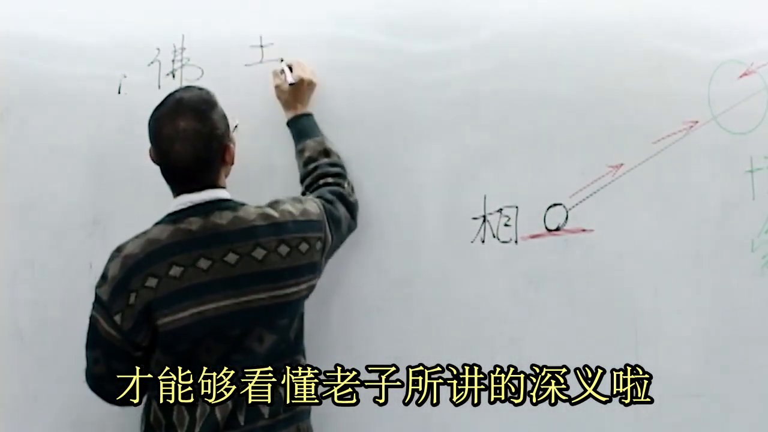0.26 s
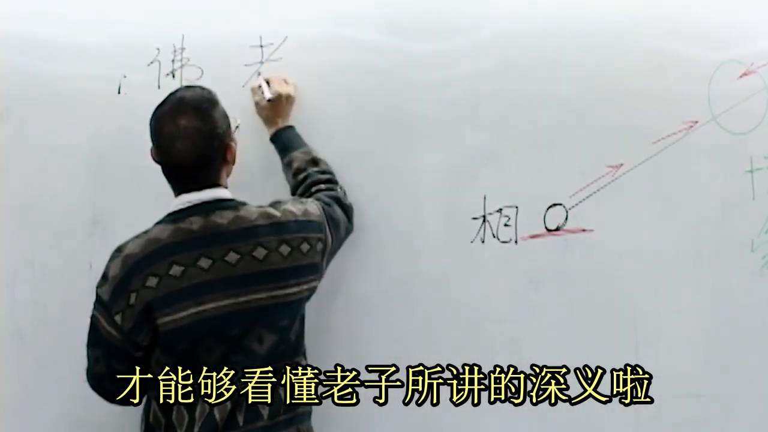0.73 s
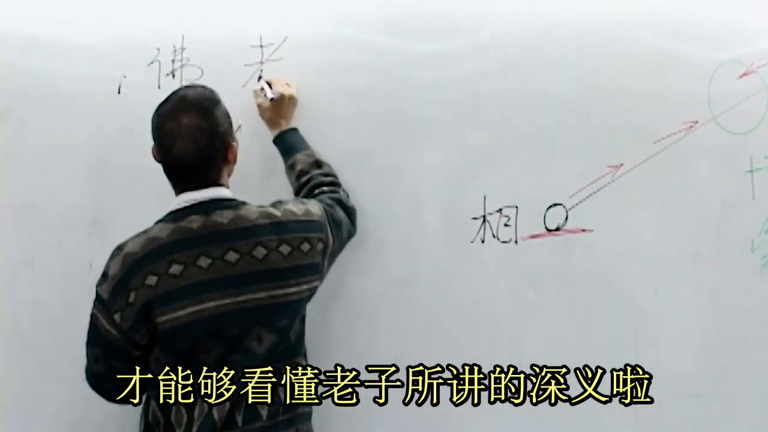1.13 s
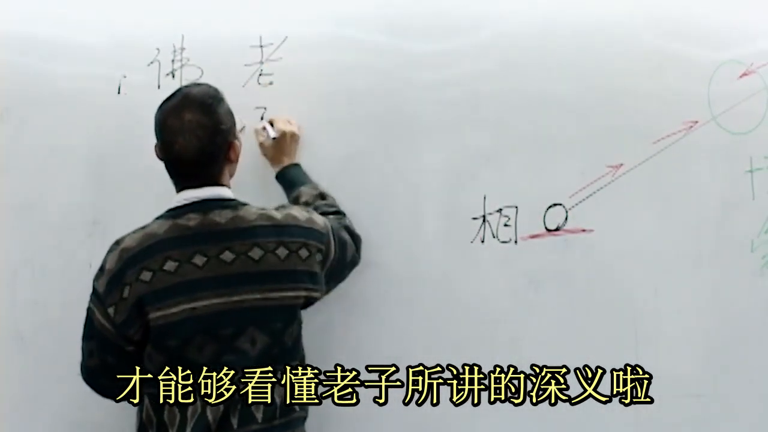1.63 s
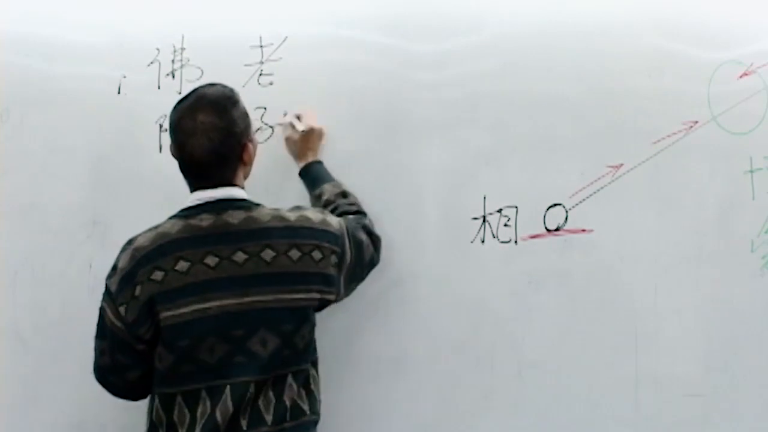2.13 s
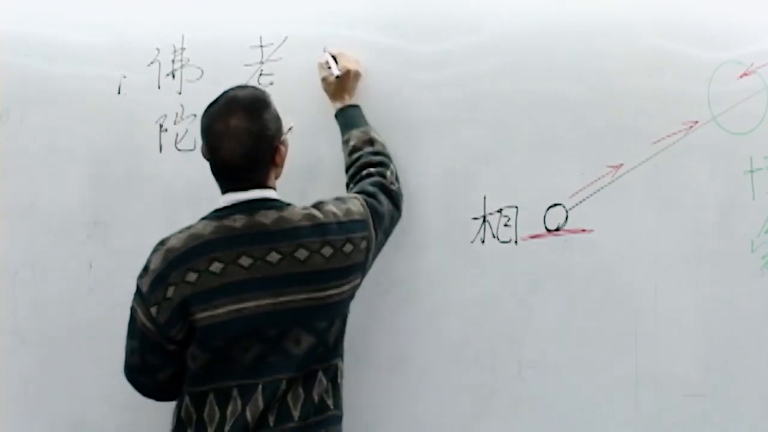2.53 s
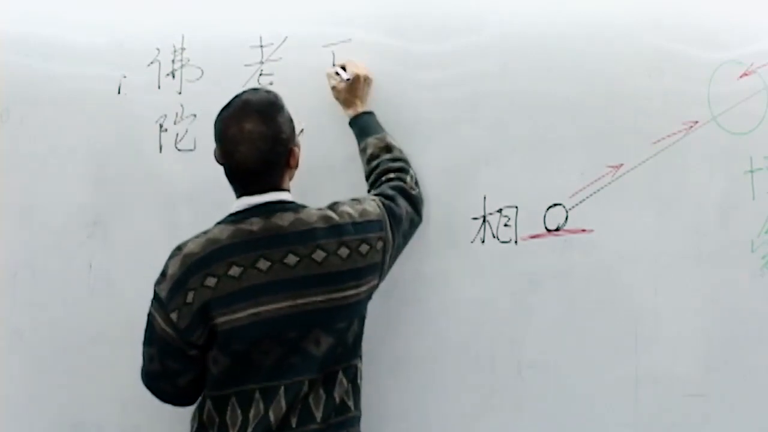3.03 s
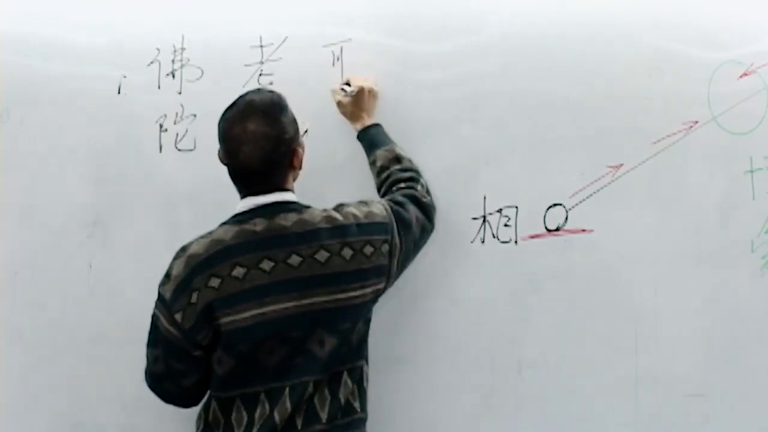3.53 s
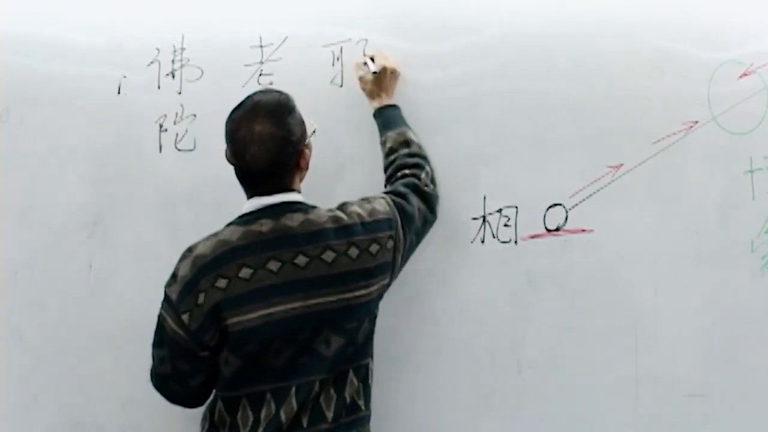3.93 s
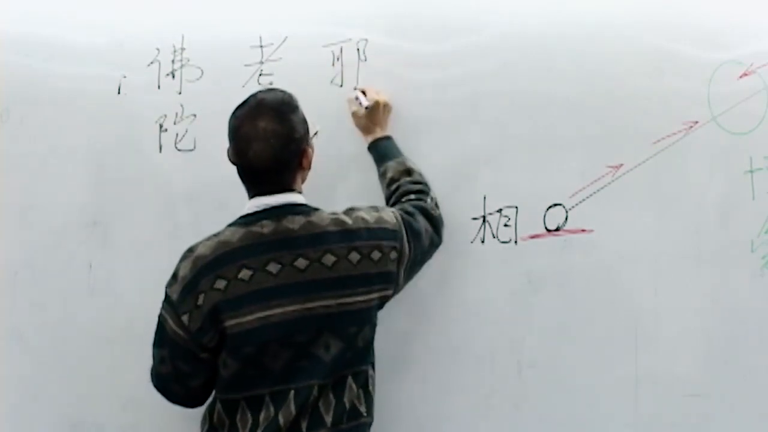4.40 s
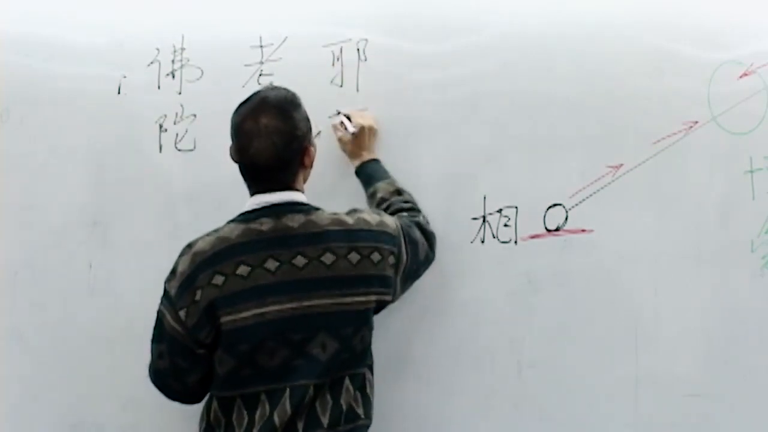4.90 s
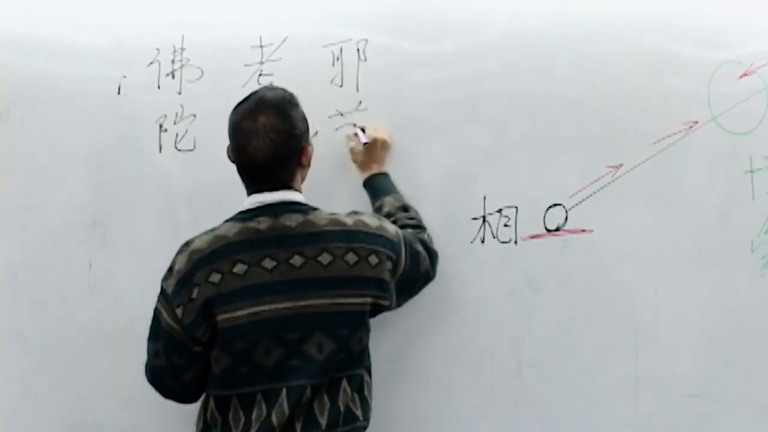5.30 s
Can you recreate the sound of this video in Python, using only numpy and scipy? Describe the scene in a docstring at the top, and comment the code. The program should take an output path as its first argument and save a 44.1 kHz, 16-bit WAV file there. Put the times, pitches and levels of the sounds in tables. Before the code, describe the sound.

A felt marker writes on a whiteboard with short high squeaks, light hiss and soft thuds over a low room hum.

```python
"""A felt marker writes on a whiteboard in a lecture room.
A low hum and a thin, wavering whine are there from the start, with the first of a few faint hollow pings.
Then the strokes begin: the felt hisses as it slides, and sticks and slips in short squeaks.
From about 1.3 s the hand also bumps soft thuds out of the board; the tip ticks and chirps on landing.
The sharpest squeak comes near 3.75 s, and a cluster of thuds near 5 s leads into the last strokes."""
import sys
import numpy as np
from scipy import signal
from scipy.fft import rfft, irfft
from scipy.io import wavfile
from scipy.ndimage import map_coordinates

SR = 44100
rng = np.random.default_rng(int(sys.argv[2]) if len(sys.argv) > 2 else 0)


def store_pcm(level_fs):
    """Save levels as 16-bit WAV."""
    pcm = np.round(np.clip(level_fs, -1, 1) * 32767).astype(np.int16)
    wavfile.write(sys.argv[1], SR, np.atleast_2d(pcm).T)


N = 244755
TIME = np.arange(N) / SR

# colour of the room's drone and of the air above it: (frequency [Hz], density [dB])
HUM_SPECTRUM = [(12, -53), (20, -16), (29, -19), (37, -7.5), (59, 3), (72, -7), (79, -16), (87, -11.5),
                (102, -25), (140, -30.5), (157, -44), (290, -59.5), (384, -61.5), (420, -60), (550, -85),
                (920, -120)]
AIR_SPECTRUM = [(200, 2), (500, 4), (1000, -3.5), (3000, -11), (15000, -12)]
# fader ride of the drone: (time [s], level [dB])
HUM_RIDE = [(0, -42), (.2, -68), (.35, -42), (.5, -64.5), (.57, -38.5), (1.0, -51.5), (1.7, -39.5),
            (1.87, -48.5), (2.16, -55.5), (2.4, -45), (2.7, -54), (3.03, -44.5), (3.2, -47), (4.0, -48),
            (5.05, -41.5), (5.55, -47.5)]
# ceiling and side echoes: (delay [s], level [dB])
ROOM_ECHOES = [(0.037, -20), (.058, -25.5)]
# faint hollow pings, and the hand bumping the board:
# (time [s], level [dB], strongest frequency [Hz], roll-off either side [dB/octave], contact time [s])
PING_HITS = [(0.002, -52.5, 818, 103, 0.026), (2.692, -61.5, 1045, 59, 0.014),
             (2.718, -48.5, 890, 63.5, 0.0088), (3.474, -47.5, 1084, 3.5, 0.014),
             (3.500, -44, 841, 37.5, 0.011), (4.548, -57.5, 1002, 69, 0.018),
             (4.567, -54.5, 1150, 34.5, 0.01)]
HAND_BUMPS = [(1.29, -68, 340, -1.5, 0.0026), (1.643, -30.5, 281, 18, 0.016),
              (3.028, -46.5, 129, 28.5, .012), (3.25, -67.5, 330, 2.5, 0.0034),
              (3.752, -29, 57.4, 14.5, 0.0089), (3.891, -32, 166, 44, 0.0069),
              (4.722, -33.5, 276, 18, 0.007), (4.986, -43.5, 399, 5.5, 0.0091),
              (5.007, -24.5, 220.3, 3.5, 0.003), (5.163, -44.5, 182, 11, 0.0092)]
# modes of the pings and of the board: (frequency [Hz], level [dB], t60 [s])
PING_MODES = [(643, -8.5, 0.24), (858.4, 3.5, 0.16), (983.5, 9, 0.17), (1187, -18, 0.17),
              (1276, -11.5, 0.16), (1480, -9, 0.16), (1627, -17, 0.17)]
BOARD_MODES = [(56.5, 4.5, 0.18), (92, -8.5, 0.53), (140.3, -8.5, 0.31), (192.5, -5.5, 0.19),
               (232, -11.5, 0.22), (282, 1.5, 0.11), (316.8, -3, .09), (396, -5.5, 0.091),
               (658, -15, 0.088), (770, -13, .06), (848, -12.5, 0.084), (1130, -22, 0.062)]
# colour of the felt's lower hiss, upper hiss, crackle and snap: (frequency [Hz], density [dB])
LOW_HISS_SPECTRUM = [(3700, -51.5), (4250, -14.5), (4600, 6.5), (5200, 6), (5700, 5), (6200, -32)]
HIGH_HISS_SPECTRUM = [(5400, -29.5), (5900, 1), (6500, 6.5), (7200, 6.5), (7600, -11.5), (8200, -24),
                      (9000, -39.5), (15000, -55.5)]
CRACKLE_SPECTRUM = [(1500, -52.5), (3400, -31), (4150, -2.5), (5200, 8), (6100, -0.5), (7200, 4),
                    (7900, -19), (8800, -31.5), (12500, -42), (15000, -50.5)]
SNAP_SPECTRUM = [(150, -5), (1200, -9), (3000, -11.5), (6000, -3), (13000, -2), (16000, -6)]
# the felt slides:
# (time [s], length [s], final level [dB], swell [dB], relative upper hiss [dB], resonance [Hz])
PEN_STROKES = [ (.26, 0.13, -64, 1, -32, 4800), (0.63, 0.11, -54.5, 20, -13, 5040),
               (.97, 0.14, -52.5, 22, -2.5, 5250), (1.325, 0.044, -51.5, 2.5, -10, 4770),
               (1.721, 0.1, -65.5, -2, -1, 4800), (1.875, 0.037, -55, 3, -0.5, 4800),
               (1.922, 0.029, -49.5, 0, -13, 4550), (2.028, 0.097, -47, 2, -8, 5070),
               (2.763, .06, -57, 12.5, -33.5, 4920), (3.05, 0.036, -59, 15, -18.5, 5450),
               (3.53, 0.098, -49.5, 11, -8.5, 5490), (3.68, 0.02, -54, 8.5, -11, 4900),
               (3.986, 0.064, -55.5, 3, -12, 5770), (4.3, 0.12, -51.5, 13.5, -17, 5300),
               (4.527, 0.29, -77, 2, -22, 5180), (4.767, 0.067, -48, 8.5, -12.5, 5000),
               (5.036, .08, -74.5, -1.5, -9, 4990), (5.216, 0.067, -69, -13, -9, 4480),
               (5.36, 0.061, -52.5, 1.5, -8.5, 4740), (5.47, 0.13, -56, 4.5, 3.5, 5500), ]
# the tip lands: (time [s], barrel ring [Hz], barrel level [dB], crackle level [dB])
TIP_LANDINGS = [ (0.388, 2540, -75.5, -45), (1.294, 2870, -48, -39), (1.659, 3030, -61, -58.5),
                (2.201, 2913, -55, -45.5), (3.257, 2722, -35.5, -38), (3.371, 2810, -50.5, -51),
                (3.483, 2804, -52, -59.5), (3.649, 2735, -40.5, -32.5), (3.746, 2645, -38.5, -22.5),
                (3.758, 2805, -36, -33), (4.48, 2897, -59, -62.5), (4.557, 2794, -66, -84.5),
                (4.88, 2815, -50.5, -56), (5.011, 2825, -101, -54.5), ]
# the tip is set down and chirps:
# (time [s], length [s], level [dB], level change [dB], last pitch [Hz], rasp [0-1])
TIP_CHIRPS = [ (1.289, 0.0077, -34, 3.5, 5720, 0.04), (1.294, 0.014, -22, -5, 4760, 0),
              (1.659, 0.0085, -23.5, -24.5, 5070, 0), (3.2504, 0.014, -17, -22, 5660, .06),
              (3.365, 0.017, -40, -8.5, 5410, .15), (3.742, 0.01, -15, 1, 5553, 0.09),
              (4.74, 0.0086, -27, -15.5, 5160, 0.01), ]
# the sliding tip catches: (time [s], length [s], level [dB], level change [dB], first pitch [Hz],
# middle pitch [Hz], last pitch [Hz], 2nd partial [dB], rasp [0-1], wall echo [dB])
TIP_SQUEAKS = [ (.245, .013, -56.5, 6, 4720, 4630, 4800, -47, 0, -17),
               (0.381, .012, -36, -8, 4650, 4264, 4290, -21.5, 0.01, -34),
               (.891, 0.019, -57.5, 4, 4660, 4390, 4550, -47.5, 0, -30.5),
               (1.07, .03, -13, -16, 4506, 4340, 3960, -24.5, .01, -17.5),
               (1.095, 0.0094, -24.5, 1, 4394, 4306, 4360, -23.5, 0.81, -15),
               (1.361, 0.025, -22.5, -6, 4483, 4350, 4247, -21.5, 0, -22),
               (2.1297, 0.02, -10.5, -18, 4780, 4828, 4320, -28, 0, -11.5),
               (2.845, 0.025, -34, -14, 4570, 4360, 4370, -16, 0, -14.5),
               (3.623, .021, -35.5, 4, 4780, 4570, 4360, -50.5, .25, -20),
               (3.7535, .016, -6, -2, 4873, 4858, 5060, -25, .02, -12),
               (4.13, 0.025, -16.5, -8.5, 4528, 4510, 5020, -26.5, 0, -10.5),
               (4.851, 0.011, -18.5, -4.5, 4784, 4676, 4370, -38, 0, -19),
               (5.181, 0.014, -24.5, -6, 4734, 4302, 4510, -21.5, 0, -14.5),
               (5.3414, 0.02, -16.5, 4.5, 4514, 4520, 4706, -35.5, 0, -21.5),
               (5.541, 0.017, -17.5, 8, 5207, 4967, 5080, -29.5, 0, -18), ]

WALL_DELAY_S = 0.0285
PURE_SECOND_DB = -45  # 2nd partial of the nearly pure chirps and lead-ins


def from_db(db):
    """Decibels to gain."""
    return 10 ** (np.asarray(db) / 20)


def rms_one(x):
    """Normalise to rms 1."""
    return x / np.sqrt(np.mean(x ** 2) + 1e-20)


def add(out, start_s, sound):
    """Mix a sound in from the given time on."""
    at = max(round(start_s * SR), 0)
    out[at:at + len(sound)] += sound[:max(N - at, 0)]


def noise(spectrum):
    """Noise of rms 1 with the given colour."""
    hz, db = np.transpose(spectrum)
    grid = np.maximum(np.fft.rfftfreq(N, 1 / SR), 1)
    eq_db = np.interp(np.log(grid), np.log(hz), db, left=-120, right=-120)
    return rms_one(irfft(rfft(rng.standard_normal(N)) * from_db(eq_db), N))


def drift(rate_hz, size=N):
    """Smooth random modulation with a spread of about 1."""
    position = np.arange(size) / SR * rate_hz
    knots = rng.standard_normal(N // 16)[:int(position[-1]) + 3]
    return map_coordinates(knots, [position], order=3, mode="nearest")


def fades(t, length, rise, fall):
    """Rounded attack and release of a contact."""
    attack = np.sin(np.pi / 2 * np.clip(t / rise, 0, 1)) ** 2
    release = np.sin(np.pi / 2 * np.clip((length - t) / fall, 0, 1)) ** 2
    return attack * release


def hum(swell_db=1.5, air_db=-92.5):
    """Room tone: a low, slowly swelling drone with a trace of air above it."""
    drone = noise(HUM_SPECTRUM) * from_db(swell_db * drift(7))
    ride_db = np.interp(TIME, *np.transpose(HUM_RIDE))
    return drone * from_db(ride_db) + from_db(air_db) * noise(AIR_SPECTRUM)


def whine(centre_hz=9976, wander_hz=79, flutter_hz=55, level_db=-80, flicker_db=2):
    """A thin high tone that wanders and flutters."""
    hz = centre_hz + wander_hz * drift(23) + flutter_hz * drift(420)
    gain = from_db(level_db + flicker_db * drift(100))
    return gain * np.sqrt(2) * np.sin(2 * np.pi * np.cumsum(hz) / SR)


def room(x, onset_s=0.0076, early_db=-21, early_t60=0.22, tail_db=-25, tail_t60=0.8,
         treble_hz=6500, treble_db=-3):
    """Distinct echoes, quick scatter off the furniture and a diffuse tail, bright with beamed treble."""
    t = TIME[:SR]
    decays = from_db(-60 * t / [[tail_t60], [early_t60]])
    tail, scatter = rng.standard_normal((2, SR)) * decays * np.minimum(t / onset_s, 1) ** 2
    response = (from_db(tail_db) * rms_one(tail) + from_db(early_db) * rms_one(scatter)) / np.sqrt(SR)
    treble = signal.lfilter(*signal.butter(1, treble_hz, "high", fs=SR), response)
    response += from_db(treble_db) * treble
    for delay, db in ROOM_ECHOES:
        response[round(delay * SR)] += from_db(db)
    return x + signal.fftconvolve(x, response)[:N]


def knocks(blows, modes, spread_db):
    """Soft blows build up over their contact time; each favours one region of the body's modes."""
    out, t = np.zeros(N), TIME[:SR]
    for start, db, strongest_hz, slope_db, contact_s in blows:
        contact = fades(t, t[-1], contact_s, contact_s)
        for k, (hz, mode_db, t60) in enumerate(modes):
            octaves_away = abs(np.log2(hz / strongest_hz))
            strength_db = db + mode_db - slope_db * octaves_away + spread_db * rng.normal()
            ring = np.sin(2 * np.pi * hz * t) * from_db(strength_db - 60 * t / t60)
            add(out, start, (-1) ** k * ring * contact)
    return out


def sliding(grain_db=0.5, edge_s=0.11, low_db=-6, flicker_db=1.5,
            sing_db=-4, sing_width_hz=230, wander_hz=110):
    """Felt drags on the board: grainy hiss swells with pen speed, half singing at the tip's resonance."""
    out, low = np.zeros(N), noise(LOW_HISS_SPECTRUM)
    high = noise(HIGH_HISS_SPECTRUM) * from_db(flicker_db * drift(45))
    # a narrow, wandering noise band, shifted up to each stroke's resonance
    band = drift(sing_width_hz) + 1j * drift(sing_width_hz)
    band *= np.exp(2j * np.pi * np.cumsum(wander_hz * drift(25)) / SR)
    for start, length, db, swell_db, upper_db, resonance_hz in PEN_STROKES:
        span = slice(max(int((start - edge_s) * SR), 0), int((start + length + edge_s) * SR))
        t = TIME[span] - start
        contact = fades(t + edge_s / 2, length + edge_s, edge_s, edge_s / 2)
        swell = from_db(db + swell_db * (np.clip(t / length, 0, 1) - 1))
        singing = np.real(band[span] * np.exp(2j * np.pi * resonance_hz * t))
        hiss = from_db(low_db) * low[span] + from_db(upper_db) * high[span]
        out[span] += contact * swell * (hiss + from_db(sing_db) * singing)
    return out * from_db(grain_db * drift(200))


def ticks(lead_s=0.0055, barrel_t60=0.061, crackle_t60=0.05, wobble=0.047):
    """Landing shakes the pen's barrel into an uneven ring, and the felt crackles briefly."""
    out, crackle = np.zeros(N), noise(CRACKLE_SPECTRUM)
    t = TIME[:SR // 10]
    for start, hz, barrel_db, tip_db in TIP_LANDINGS:
        phase = 2 * np.pi * np.cumsum(hz * (1 + wobble * drift(280, len(t)))) / SR
        barrel = 2 * np.sin(phase) * from_db(barrel_db - 60 * (t - lead_s) / barrel_t60)
        tip = np.roll(crackle, rng.integers(N))[:len(t)] * from_db(tip_db - 60 * t / crackle_t60)
        add(out, start - lead_s, barrel * fades(t, t[-1], rise=0.0081, fall=0.01))
        add(out, start, tip * fades(t, t[-1], rise=0.00077, fall=0.01))
    return out


def stick_slip(length, db, change_db, pitches, second_db, rasp, grit, snap, waver=0.0012,
               rasp_waver=0.042, shimmer_db=1, half_db=-10, grit_db=-45, rasp_grit_db=-10, snap_db=-30):
    """The tip sticks and slips thousands of times a second: a tone gliding through three pitches."""
    t = TIME[:int(length * SR)]
    along = t / length
    level_db = db + change_db * along ** 1.5 + shimmer_db * drift(360, len(t))
    envelope = from_db(level_db) * fades(t, length, rise=0.0045, fall=0.0035)
    glide_hz = np.polyval(np.polyfit([0, 0.5, 1], pitches, 2), along)
    jitter = (waver + rasp_waver * rasp) * drift(1300, len(t))
    phase = 2 * np.pi * np.cumsum(glide_hz * (1 + jitter)) / SR
    # the slips are sharp only at full swing, so overtones fade before the fundamental
    swing = envelope / envelope.max()
    third_db = second_db - 1.5 + db  # sinks in softer squeaks
    second = np.sqrt(swing) * from_db(second_db) * np.sin(2 * phase)
    third = swing ** 2 * from_db(third_db) * np.sin(3 * phase)
    # in a rasp every other slip differs, so half-pitch partials appear
    halves = from_db(half_db) * np.sin(phase / 2) + np.sin(1.5 * phase)
    tone = np.sqrt(2) * (np.sin(phase) + second + third + rasp * halves)
    # rasping adds grit; only the hardest squeaks snap across the whole range
    piece = rng.integers(N // 2) + np.arange(len(t))
    scratch = (from_db(grit_db) + rasp * from_db(rasp_grit_db)) * grit[piece]
    bite = envelope ** 2 * from_db(snap_db) * snap[piece]
    return (tone + scratch + bite) * envelope


def chirps(grit, snap, from_hz=4450, rise_by_halfway=0.74, echo_db=-22):
    """Set down on the board, the tip slips at once in an upward chirp that slaps back off the wall."""
    out = np.zeros(N)
    for start, length, db, change_db, last_hz, rasp in TIP_CHIRPS:
        pitches = from_hz + (last_hz - from_hz) * np.array([0, rise_by_halfway, 1])
        chirp = stick_slip(length, db, change_db, pitches, PURE_SECOND_DB, rasp, grit, snap)
        add(out, start, chirp)
        add(out, start + WALL_DELAY_S, from_db(echo_db) * chirp)
    return out


def squeaks(grit, snap, lead_s=0.017, overlap_s=0.005, lead_db=-30.5, lead_swell_db=9.5, lead_sharp=0.11):
    """The tip sings softly down onto pitch, then catches; the tone is beamed, so its wall echo varies."""
    out = np.zeros(N)
    for start, length, db, change_db, *pitches, second_db, rasp, echo_db in TIP_SQUEAKS:
        descent = pitches[0] * (1 + lead_sharp * np.array([1, 0.5, 0]))
        lead_in = stick_slip(lead_s + overlap_s, db + lead_db, lead_swell_db, descent,
                             PURE_SECOND_DB, rasp, grit, snap)
        squeak = stick_slip(length, db, change_db, pitches, second_db, rasp, grit, snap)
        add(out, start - lead_s, lead_in)
        add(out, start, squeak)
        add(out, start + WALL_DELAY_S, from_db(echo_db) * squeak)
    return out


def scene():
    """Mono mix: pen, board and whine go through the room; pings and hum stay dry."""
    grit, snap = noise(CRACKLE_SPECTRUM), noise(SNAP_SPECTRUM)
    writing = squeaks(grit, snap) + chirps(grit, snap) + ticks() + sliding()
    thuds = knocks(HAND_BUMPS, BOARD_MODES, spread_db=1.5)
    pings = knocks(PING_HITS, PING_MODES, spread_db=5)
    return (room(writing + thuds + whine()) + pings + hum())[None]


def record(dry):
    """A steep low-pass takes off the very top."""
    cutoff_hz = 15400
    return signal.sosfilt(signal.ellip(10, 0.1, 80, cutoff_hz, fs=SR, output="sos"), dry)


dry = scene()
out = record(dry)
store_pcm(out)
```